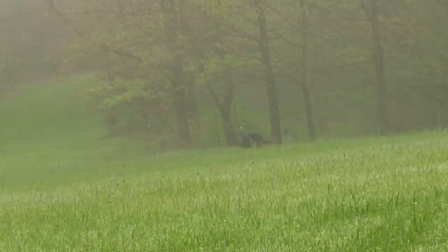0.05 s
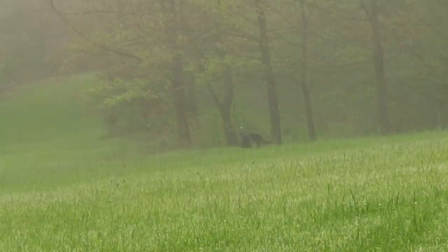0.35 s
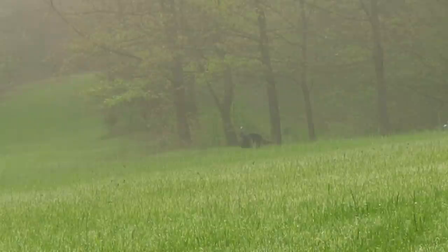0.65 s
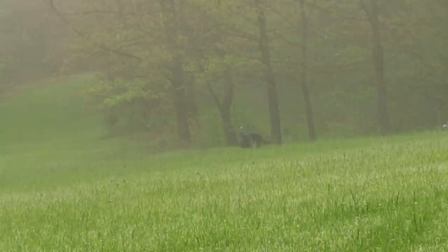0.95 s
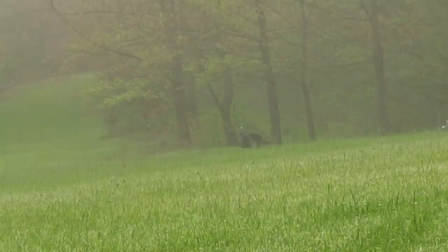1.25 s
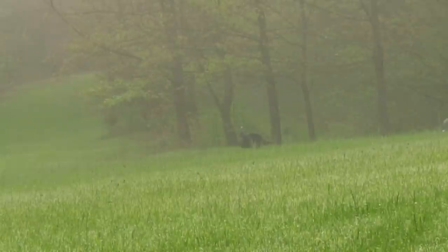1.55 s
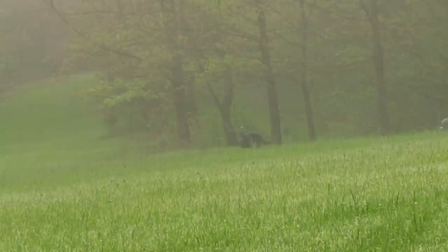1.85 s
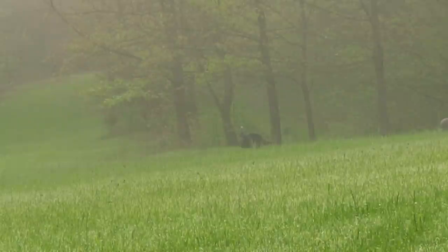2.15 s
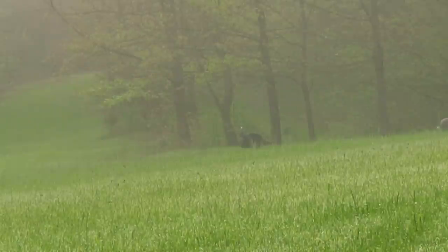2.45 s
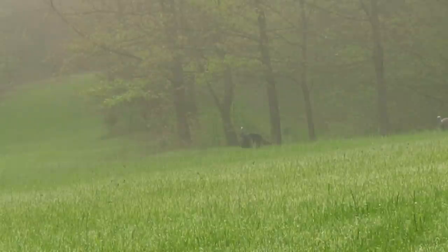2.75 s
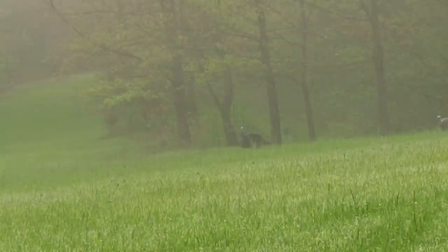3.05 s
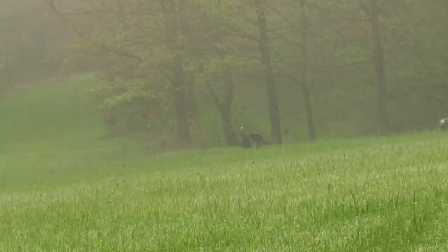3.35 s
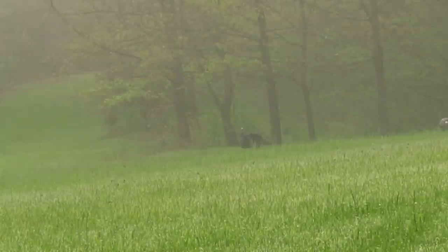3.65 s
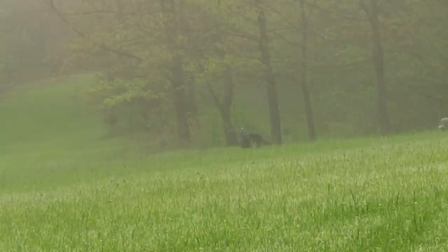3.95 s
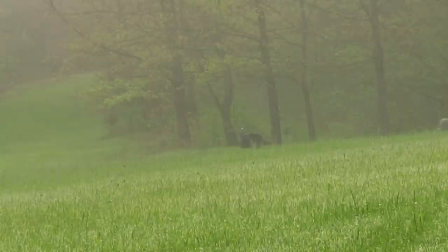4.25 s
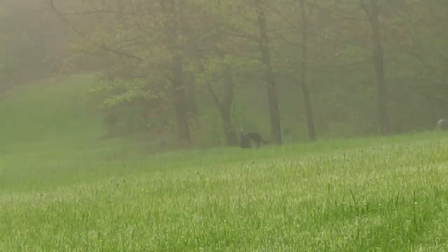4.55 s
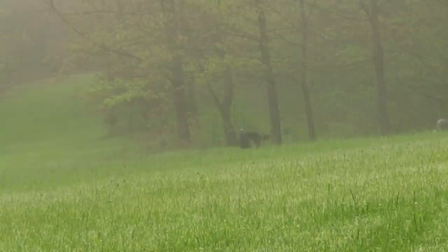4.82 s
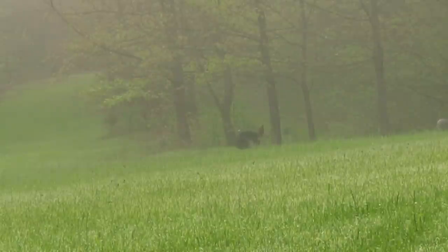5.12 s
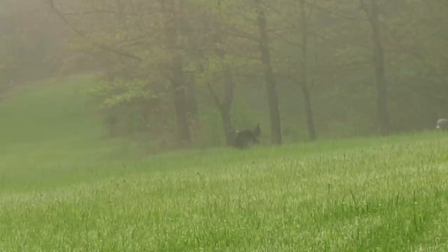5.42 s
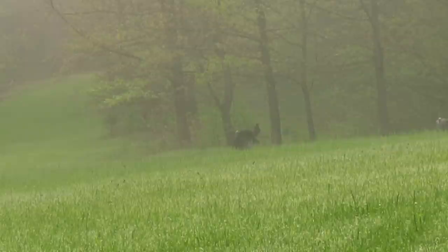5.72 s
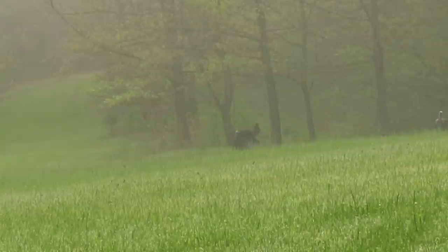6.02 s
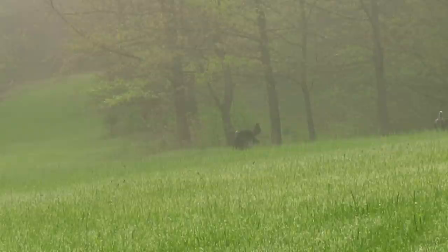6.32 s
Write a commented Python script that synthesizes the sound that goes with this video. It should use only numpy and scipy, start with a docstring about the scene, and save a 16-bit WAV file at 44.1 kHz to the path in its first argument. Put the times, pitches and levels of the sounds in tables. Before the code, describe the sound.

At the edge of a field, small songbirds chirp and whistle faintly in distant trees over a quiet rumble, with a few dry ticks nearby. A wild turkey close to the microphone then gives two raspy putts, each followed by a rush of air. It adds one soft yelp and three hard, evenly spaced ones. The songbirds return with a few thin, falling notes.

```python
"""A quiet rumble and a distant high hiss lie over the misty edge of a field. Songbirds whistle far off
in the trees, which give back a faint echo, and a few dry ticks sound nearby. Then a wild turkey close by
clucks six times, its syrinx buzzing through the resonances of windpipe and beak: two rising, raspy putts
with a rush of air after each, one soft yelp, then three hard ones. The songbirds have the last notes."""
import sys
import numpy as np
from scipy import signal
from scipy.fft import rfft, irfft, next_fast_len
from scipy.io import wavfile
from scipy.ndimage import uniform_filter1d

SR = 44100
rng = np.random.default_rng(int(sys.argv[2]) if len(sys.argv) > 2 else 0)


def dump(signal):
    """Clip the signal to [-1, 1] and save it as 16-bit WAV at the path in sys.argv[1]."""
    limited = np.clip(np.atleast_2d(signal).T, -1, 1)
    pcm = np.round(limited * 32767).astype(np.int16)
    wavfile.write(sys.argv[1], SR, pcm)


N = 281358
T = np.arange(N) / SR

# spectrum of the outdoor rumble: frequency_hz, gain_db
RUMBLE_SPECTRUM = [(15, -60), (25, -23), (86, -2), (126, -1), (156, -0.5), (289, -3), (322, -8),
                   (389, -5.5), (631, -12), (1170, -14), (1660, -21), (1800, -15.5), (2120, -20.5),
                   (3260, -20), (15500, -35.5)]
# width of the background, central in the bass and wide in the treble: frequency_hz, side_minus_mid_db
RUMBLE_WIDTH = [(60, -17), (110, -16), (200, -14), (380, -13), (700, -6), (1290, -9), (2380, -10),
                (4400, -7), (8120, -3), (15000, -2)]
# envelope of the thin hiss out of the trees: time_s, level_db
HISS_ENVELOPE = [(0, -67), (.7, -73), (1.1, -67.5), (1.5, -64), (2.1, -67.5), (2.35, -65), (2.6, -87),
                 (3.3, -97), (3.5, -68), (4, -86.5), (6.38, -89)]
# thin falling notes sung in two voices at once: start_s, level_db, echo_db
THIN_NOTES = [(.03, -70.5, 0.5), (5.78, -62.5, -7.5)]
# those two voices: start_hz, end_hz
THIN_VOICES = [(6700, 5550), (8400, 6900)]
# single songbird notes: start_s, length_s, start_hz, end_hz, level_db, echo_db
CHIRPS = [(0.119, .12, 4000, 3160, -64.5, -2), (1.478, .03, 4480, 4120, -46.5, -1.5),
          (1.526, 0.033, 3800, 3480, -52.5, 2), (1.603, 0.017, 4150, 2900, -56, 5.5),
          (1.902, .031, 2400, 5400, -53, 7.5), (2.088, 0.067, 2850, 2550, -56, -4),
          (2.129, 0.04, 3690, 2870, -61.5, 10), (2.167, .065, 3190, 4890, -61, 10),
          (3.573, .065, 4400, 2400, -67, 1), (3.647, 0.05, 3460, 2598, -69, 0),
          (5.45, 0.078, 4050, 3583, -62, -9), (6.11, 0.14, 4930, 4540, -52.5, -3.5),
          (6.235, 0.053, 4600, 2920, -48, 0), (6.348, 0.072, 3040, 4720, -48.5, -1)]
# a repeated phrase, a quick flick up and a long slur down: top_s, level_db
SLURS = [(5.685, -54), (5.943, -49)]
# small ticks close by: start_s, level_db
TICKS = [(0.297, -47), (0.435, -50), (.45, -45), (1.062, -53)]
# putts: crest_s, swell_db, fall_s, pitch_hz, climb_start_s, level_db, throat_hz, roughness (0-1),
# bass_db, bright_db, left_minus_right_db, air_length_s, air_db
PUTTS = [(2.448, -16, .021, 670, 2.417, -20.5, 1450, .42, 18, 1, -3.5, 0.18, -39.5),
         (3.376, -24, .034, 630, 3.374, -14.5, 1550, .6, 6.5, 5, -2, 0.2, -36)]
# resonances of windpipe and beak: frequency_hz, gain_db
WINDPIPE = [(300, -24), (590, -12), (850, -7), (1160, 0), (1420, -4), (1780, 0), (2380, -1), (2950, -9),
            (3900, -27), (4650, -14), (5250, -25), (7600, -38), (10000, -36), (15500, -55)]
# spectrum of the hiss at the edge of the beak: frequency_hz, gain_db
SPIT_SPECTRUM = [(1000, -25), (2700, 6), (3900, -7), (4650, 2), (5300, -7), (6400, -2), (7800, -10),
                 (8850, 10), (9550, -3), (10200, 9), (11000, -9), (11700, 1), (13500, -20), (15400, -5)]
# squeaks that the first putt breaks into: start_s, length_s, level_db
SQUEAKS = [(2.444, .009, -25), (2.456, .013, -28)]
# spectrum of the air after a putt: frequency_hz, gain_db
AIR_SPECTRUM = [(500, -0.5), (1100, 6), (1400, -4.5), (1850, 3), (2250, -6), (2650, 1), (3000, -3),
                (3600, 0.5), (4800, -17.5), (6500, -10), (8500, 1), (10000, -12), (15000, -9)]
# yelps: push_start_s, hold_s, pitch_hz, swoop (share of pitch), closing_hz, level_db, throat_hz,
# roughness (0-1), bass_db, bright_db, left_minus_right_db
YELPS = [(3.804, .036, 517.5, 0, 560, -28.5, 1030, .17, 11, -12, -0.5),
         (4.154, .035, 546.3, 0.45, 590, -11.7, 1060, .18, -1, -1.5, -0.4),
         (4.502, .032, 576.4, 0.00063, 880, -6.4, 1130, .045, 0, 3, 0.4),
         (4.852, .035, 600.4, 0, 950, -6.2, 2430, .035, -1, 0, 1.2)]
# how two microphone ports hear the turkey: frequency_hz, left_lead_rad, left_minus_right_db
PORT_RESPONSE = [(294, 0, 0), (700, 0.32, -2), (1190, -0.63, -1), (1680, 0.34, -5.5), (2201, 0.3, 0.5),
                 (3300, 0.62, -1.5), (4480, 0.28, -1.5), (5000, -1.7, 0), (5780, -0.52, 1.5),
                 (8980, 1, -5.5), (9900, 0.31, 1)]

TOP_HZ = 15900
SQUEAK_HZ = (2780, 3480, 3510)  # start, middle, end
# a yelp's stages, and its levels relative to the top of the push
ONSET_S, LEAD_S, ATTACK_S, SETTLE_S, RELEASE_S, CRACK_S, DIE_S = .007, .016, .006, .012, .016, .008, .016
QUIET_DB, LEAD_DB, ARCH_DB, LET_GO_DB, CRACK_DB = -40, -12.3, -2.5, -18, -18.5
LEAD_ROUGH, CRACK_ROUGH, STRAIN_ROUGH, STRAIN_DB = .17, .5, .4, -4.5
THROAT_OPEN_HZ, THROAT_TIGHT_HZ, THROAT_CRACK_HZ = 1150, 2200, 1000


def undb(db):
    """Amplitude ratio for a level in decibels."""
    return 10 ** (np.asarray(db) / 20)


def colour(points, hz):
    """Gain of a spectrum, interpolated in decibels over log frequency."""
    f, db = np.transpose(points)
    return undb(np.interp(np.log(hz + 1), np.log(f), db))


def filtered(x, points):
    """Linear filtering: multiplication by a gain in the frequency domain."""
    size = next_fast_len(N)
    return irfft(rfft(x, size) * colour(points, np.fft.rfftfreq(size, 1 / SR)), size)[:N]


def noise(points):
    """Gaussian noise of rms 1 with the given spectrum."""
    x = filtered(rng.standard_normal(next_fast_len(N)), points)
    return x / np.sqrt(np.mean(x ** 2))


def walk(rate, size):
    """Smooth random modulation of spread near 1 that changes rate times a second."""
    k = max(int(SR / rate), 1)
    steps = np.repeat(rng.standard_normal(size // k + 1), k)
    return 1.245 * uniform_filter1d(uniform_filter1d(steps, k), k)[:size]


def ramp(t, start, length):
    """Linear rise from 0 to 1."""
    return np.clip((t - start) / length, 0, 1)


def span(start, end):
    """A time window: its sample indices and a short taper at both ends."""
    at = np.flatnonzero((T >= start) & (T <= end))
    return at, np.clip(np.minimum(T[at] - start, end - T[at]) / 0.0015, 0, 1)


def pan(x, db):
    """Direction by level difference: db louder on the left."""
    return x * undb(np.array([[db], [-db]]) / 2)


def field(rumble_db=-56):
    """Distant rumble, hiss and a narrow-band murmur; an uncorrelated side signal widens the rumble."""
    side = filtered(noise(RUMBLE_SPECTRUM), RUMBLE_WIDTH)
    rumble = (noise(RUMBLE_SPECTRUM) + side * np.array([[1], [-1]])) * undb(rumble_db)
    hiss = noise([(2500, -37), (4500, -4), (6100, -1), (7300, -6.5), (9500, -16), (14000, -34)])
    hiss *= undb(np.interp(T, *np.transpose(HISS_ENVELOPE)) + 1.2 * walk(20, N))
    murmur = noise([(900, -50.5), (1650, -7.5), (1820, -0.5), (2000, -28), (3500, -47.5)])
    murmur *= undb(-73 + 3 * walk(6.6, N))
    return rumble + hiss + murmur


def whistle(start, length, start_hz, middle_hz, end_hz, db, flicker_db=3.5):
    """A gliding pure tone; random frequency and amplitude modulation give it a fine quaver."""
    u = (T - start) / length
    at = np.flatnonzero((u > 0) & (u < 1))
    u, out = u[at], np.zeros(N)
    quaver = 1 + .012 * walk(900, len(at))
    hz = np.polyval(np.polyfit([0, .5, 1], [start_hz, middle_hz, end_hz], 2), u) * quaver
    swell = np.sqrt(2 * np.sin(np.pi * u))
    out[at] = np.sin(2 * np.pi * np.cumsum(hz) / SR) * swell * undb(db + flicker_db * walk(150, len(at)))
    return out


def glide(start, length, start_hz, end_hz, db, sag=.02):
    """A songbird's note: a frequency sweep whose middle hangs just below a straight line."""
    return whistle(start, length, start_hz, (start_hz + end_hz) / 2 * (1 - sag), end_hz, db)


def twitter(count=6, length_s=.07, centre_hz=3400, level_db=-71):
    """Faint sweeps from deeper in the wood, random in time and in their end frequencies."""
    return sum(glide(.95 * when * T[-1], length_s, *centre_hz * (1 + .3 * (np.array(ends) - .5)), level_db)
               for when, *ends in rng.random((count, 3)))


def trees(x, t60, delay, spread=0.17):
    """Reverberation: countless small echoes build up and decay exponentially; spread sets the width."""
    t = T[:3 * SR]
    echoes = rng.standard_normal((3, len(t))) * undb(-60 * t / t60) * (1 - np.exp(-(t / delay) ** 2))
    echoes = echoes[0] + spread * echoes[1:]
    echoes /= np.sqrt(np.sum(echoes ** 2, axis=1, keepdims=True))
    return signal.fftconvolve(x[None], echoes, axes=1)[:, :N]


def songbirds(flick_s=.025, slur_s=.118, slur_top_hz=4400, thin_s=.19):
    """Small birds in the wood: each note is direct sound plus its reflections off trunks and leaves."""
    notes = [(glide(*row[:-1]), row[-1]) for row in CHIRPS] + [(twitter(), -7)]  # sound, echo_db
    for s, db in SLURS:
        flick = glide(s - flick_s, flick_s, start_hz=2720, end_hz=slur_top_hz, db=db - 12)
        slur = glide(s, slur_s, start_hz=slur_top_hz, end_hz=3310, db=db)
        notes.append((flick + slur, -2))
    for s, db, echo_db in THIN_NOTES:
        notes += [(glide(s, thin_s, *voice, db), echo_db) for voice in THIN_VOICES]
    direct = sum(note for note, _ in notes)
    scattered = sum(note * undb(echo_db) for note, echo_db in notes)
    return direct + trees(scattered, t60=1.0, delay=0.009)


def ticks(decay_s=0.0037):
    """Dry transients: noise with a sudden onset and an exponential decay."""
    envelope = sum(undb(db) * (T >= s) * np.exp(-np.abs(T - s) / decay_s) for s, db in TICKS)
    return envelope * noise([(700, -5), (1800, 4), (5000, 2), (8000, -4), (12000, -28)])


def turkey_voice(at, fade, hz, db, throat_hz, rough, bass_db, bright_db, width_hz=380, throat_gain=1.34,
                 jitter=.075, shimmer=.99, scatter=.17, rasp_db=-13.5, spit_db=-25, crackle_db=3.8):
    """Source and filter: the syrinx buzzes into the windpipe; a throat resonance lifts one harmonic."""
    size = len(at)
    rough = np.clip(rough, 0, 1)
    treble = undb(bright_db + .28 * (db - db.max()))  # the harder the push, the brighter
    phase = 2 * np.pi * np.cumsum(hz * (1 + jitter * rough * walk(500, size))) / SR
    voice, power = np.zeros(size), np.zeros(size)
    for k in np.arange(1, 29):
        throat = 1 + throat_gain / (1 + 1j * (k * hz - throat_hz) / width_hz) ** 2
        gain = colour(WINDPIPE, k * hz) * throat * (k * hz < TOP_HZ)
        # a loose throat lifts the bass, a tight one the treble
        gain *= undb(bass_db) ** np.clip((930 - k * hz) / 280, 0, 1)
        gain *= treble ** np.clip((k * hz - 1800) / 2200, 0, 1)
        slip = scatter * k * (rough + .1) * walk(700, size)  # high harmonics lose their step first
        harmonic = np.real(gain * np.exp(1j * (k * phase + slip)))
        voice += harmonic * (1 + shimmer * rough * walk(450, size))
        power += np.abs(gain) ** 2 / 2
    # air escapes once a cycle, through the same windpipe and as a crackling spit at the beak
    opening = 1 + .5 * np.cos(phase)
    rasp = undb(rasp_db) * noise(WINDPIPE)[at] * 2 * rough
    crackle = undb(spit_db + crackle_db * walk(600, size))
    spit = crackle * noise(SPIT_SPECTRUM)[at] * (.5 + rough) * np.sqrt(treble)
    out = np.zeros(N)
    out[at] = (voice / np.sqrt(power) + opening * (rasp + spit)) * undb(db) * fade
    return out


def putt(crest, swell_db, fall, pitch_hz, climb_at, level_db, throat_hz, rough, bass_db, bright_db,
         side_db, air_s, air_db, rise_s=.04, onset_s=.013, end_db=-25, climb_hz_per_s=10500,
         ceiling_hz=1040, throb_hz=62, throb_db=-5.5):
    """A raspy note swells and climbs, throbbing by amplitude modulation; air rushes out after it."""
    at, fade = span(crest - rise_s, crest + fall)
    t = T[at] - crest
    hz = np.minimum(pitch_hz + climb_hz_per_s * np.maximum(T[at] - climb_at, 0), ceiling_hz)
    shape_db = swell_db * ramp(-t, 0, rise_s) ** 1.5 + end_db * ramp(t, 0, fall) ** 1.5
    db = level_db + shape_db + throb_db * np.sin(np.pi * throb_hz * t) ** 2
    fade *= ramp(t, -rise_s, onset_s)
    voice = turkey_voice(at, fade, hz, db, throat_hz, rough, bass_db, bright_db)
    return pan(voice, side_db) + beak_air(crest, air_s, air_db)


def beak_air(start, length, level_db, sag_db=-9, closing_share=.55, closed_db=-13, leak_db=-32,
             flutter_db=2):
    """Flow noise through the beak: its pass band sinks and narrows as the beak closes."""
    at, fade = span(start, start + length)
    u = (T[at] - start) / length
    closed = ramp(u, 1 - closing_share, closing_share)
    db = level_db + sag_db * u + closed_db * closed ** 2
    low_hz = np.interp(closed, [0, 1], [1400, 845])
    high_hz = np.interp(closed, [0, 1], [4200, 950])
    size = len(at)
    f = np.fft.rfftfreq(size, 1 / SR)
    white = rfft(rng.standard_normal(size))
    rush, power = np.zeros(size), np.zeros(size)
    for hz in 400 * 2 ** (np.arange(32) / 6):  # sixth-octave bands
        band = irfft(white * np.clip(1 - 6 * np.abs(np.log2((f + 1) / hz)), 0, 1), size)
        low_pass = undb(leak_db) * (high_hz / 4000) ** 2 + 1 / (1 + (hz / high_hz) ** 5)
        gain = colour(AIR_SPECTRUM, hz) * low_pass / (1 + (low_hz / hz) ** 4)
        rush += gain * band
        power += gain ** 2 * np.mean(band ** 2)
    out = np.zeros(N)
    out[at] = rush / np.sqrt(power) * undb(db + flutter_db * walk(220, size)) * fade
    return out


def yelp(start, hold, pitch_hz, swoop, closing_hz, level_db, throat_hz, rough, bass_db, bright_db,
         side_db):
    """Tension sets pitch and resonance: a quiet lead-in, a held or swooping push, a cracked end."""
    let_go = hold + RELEASE_S
    cracked = let_go + CRACK_S
    stages = [-LEAD_S - ONSET_S, -LEAD_S, -ATTACK_S, 0, hold, let_go, cracked, cracked + DIE_S]
    stage_db = [QUIET_DB, LEAD_DB, LEAD_DB, ARCH_DB, ARCH_DB, LET_GO_DB, CRACK_DB, QUIET_DB]
    at, fade = span(start + stages[0], start + stages[-1])
    t = T[at] - start
    # a swooping voice strains: weaker and rougher
    strain = np.sin(np.pi * ramp(t, 0, let_go)) ** 2 * (swoop > 0)
    arch = np.sin(np.pi * ramp(t, 0, hold))
    db = level_db + np.interp(t, stages, stage_db) - ARCH_DB * arch + STRAIN_DB * strain
    rough = np.interp(t, [-ATTACK_S, ATTACK_S, hold, let_go], [LEAD_ROUGH, rough, rough, CRACK_ROUGH])
    rough += STRAIN_ROUGH * strain
    tension = 1 + swoop * strain
    flat = .04 * (1 - ramp(t, -LEAD_S, LEAD_S + ATTACK_S))  # the lead-in slides up to pitch
    hz = pitch_hz * tension * (1 - flat)
    # the throat tightens through the lead-in, drops open with the push and then settles
    throat_path_hz = [THROAT_OPEN_HZ, THROAT_TIGHT_HZ, THROAT_OPEN_HZ, throat_hz]
    throat = tension ** 2 * np.interp(t, [stages[0], -ATTACK_S, 0, SETTLE_S], throat_path_hz)
    crack = ramp(t, let_go - ATTACK_S, ATTACK_S)
    hz += crack * (closing_hz - hz)
    throat += crack * (THROAT_CRACK_HZ - throat)
    return pan(turkey_voice(at, fade, hz, db, throat, rough, bass_db, bright_db), side_db)


def ports(x):
    """A close source reaches two microphone ports with small differences of phase and level."""
    size = next_fast_len(N)
    hz, lead, side_db = np.transpose(PORT_RESPONSE)
    f = np.fft.rfftfreq(size, 1 / SR)
    half = undb(np.interp(f, hz, side_db) / 2) * np.exp(.5j * np.interp(f, hz, lead))
    return irfft(rfft(x, size) * np.array([half, 1 / half]), size)[:, :N]


def turkey_calls(lowest_hz=400, dull_hz=1700):
    """Direct sound, brief scattering off the grass and a faint, dull echo from the edge of the wood."""
    near = sum(putt(*row) for row in PUTTS) + sum(yelp(*row) for row in YELPS)
    near += sum(whistle(s, length, *SQUEAK_HZ, db) for s, length, db in SQUEAKS)
    # the calls carry no deep bass
    near = signal.sosfilt(signal.butter(3, lowest_hz, "high", fs=SR, output="sos"), near)
    dull = signal.sosfilt(signal.butter(1, dull_hz, fs=SR, output="sos"), near.mean(axis=0))
    grass = undb(-17) * trees(dull, t60=.09, delay=0.0033, spread=1.5)
    wood = undb(-39) * trees(dull, t60=3.6, delay=0.06, spread=0.48)
    return ports(near) + grass + wood


def scene():
    """Superposition: the sound pressures of all sources add."""
    return turkey_calls() + songbirds() + ticks() + field()


def record(dry):
    """Clipping at full scale, then band limiting by a steep low-pass filter."""
    return signal.sosfilt(signal.ellip(10, .2, 70, TOP_HZ, fs=SR, output="sos"), np.clip(dry, -1, 1))


dry = scene()
out = record(dry)
dump(out)
```